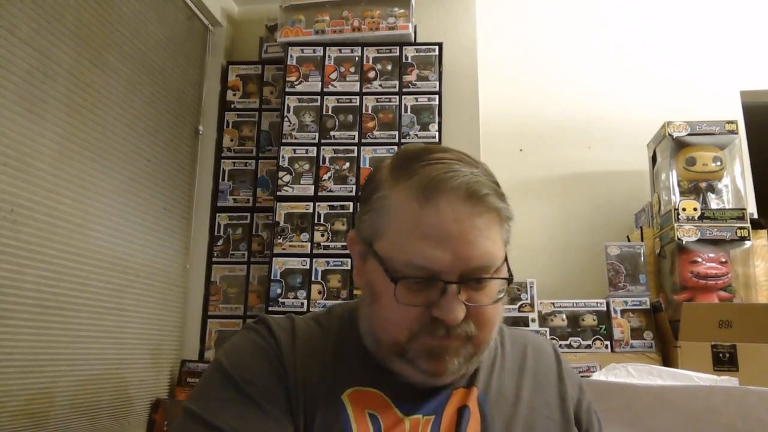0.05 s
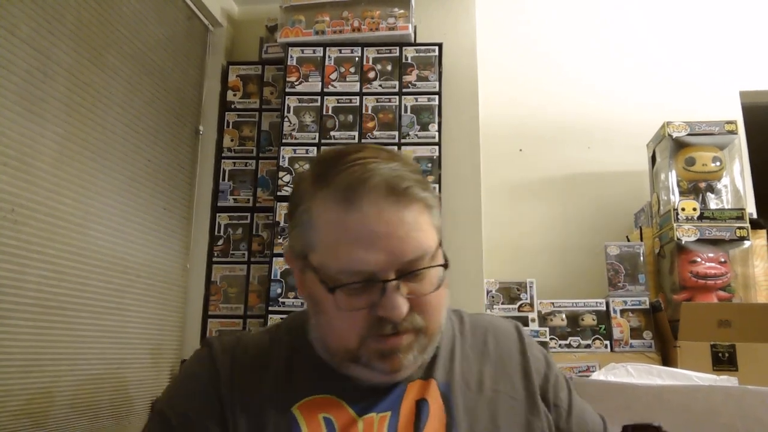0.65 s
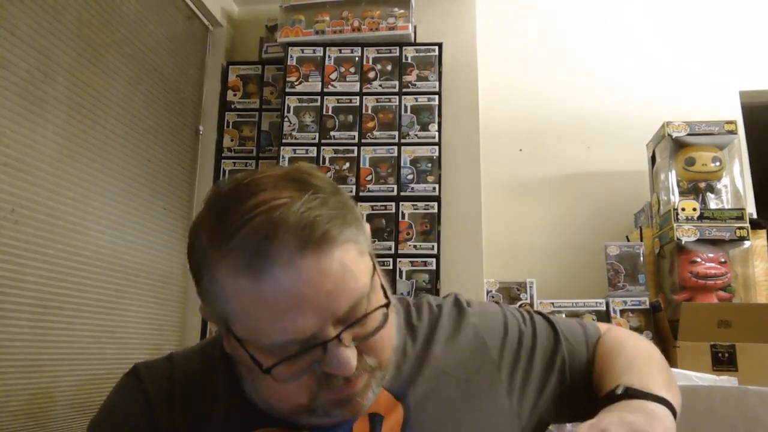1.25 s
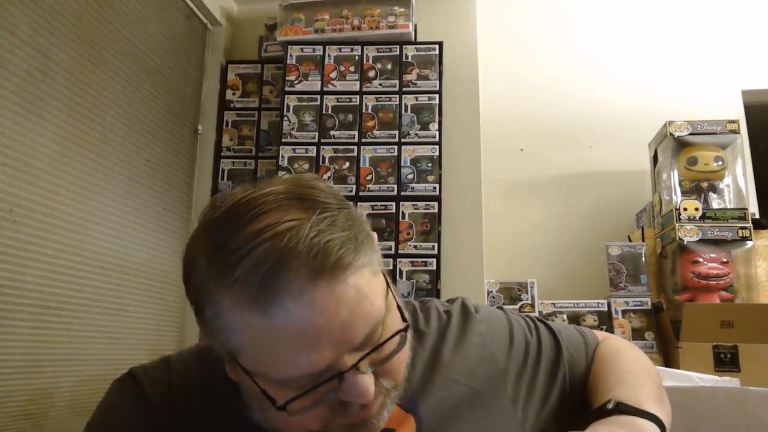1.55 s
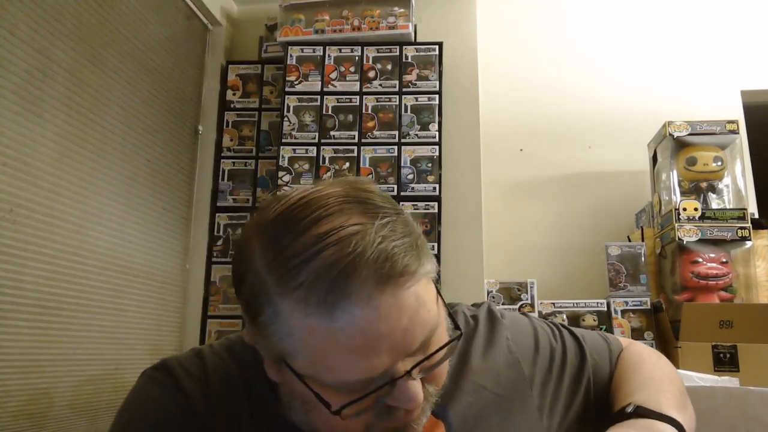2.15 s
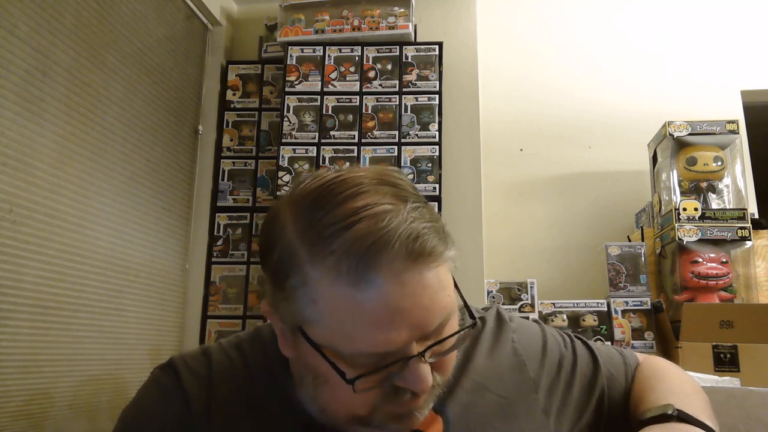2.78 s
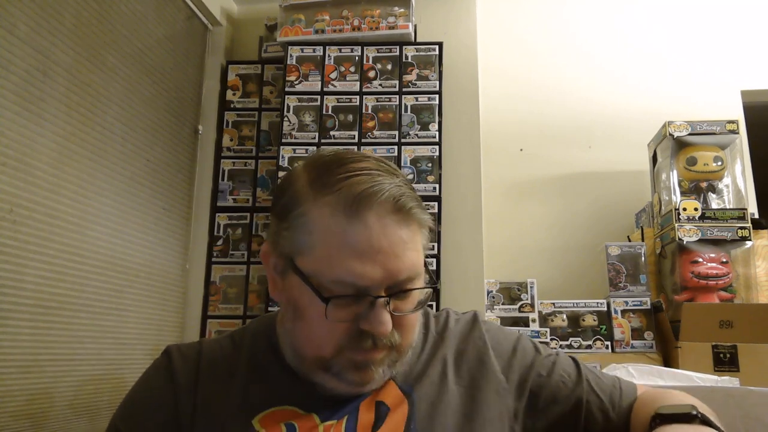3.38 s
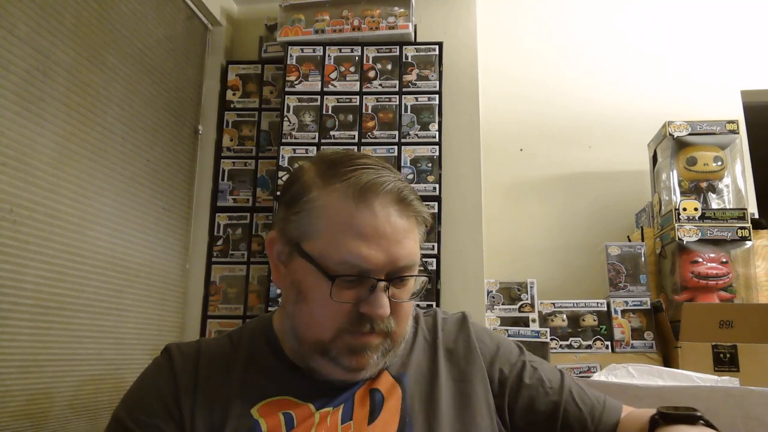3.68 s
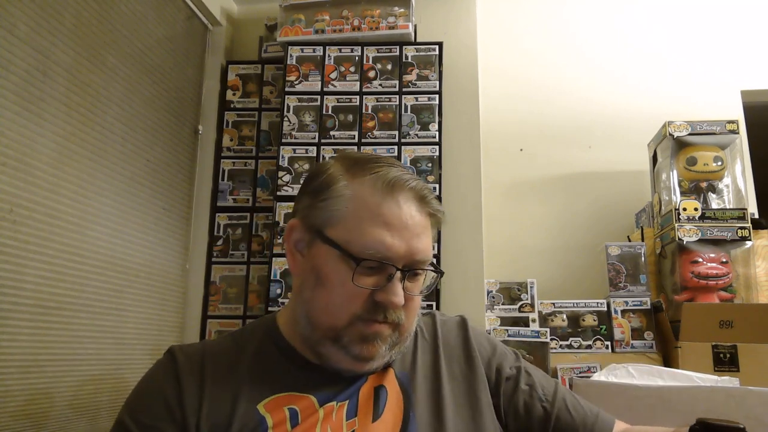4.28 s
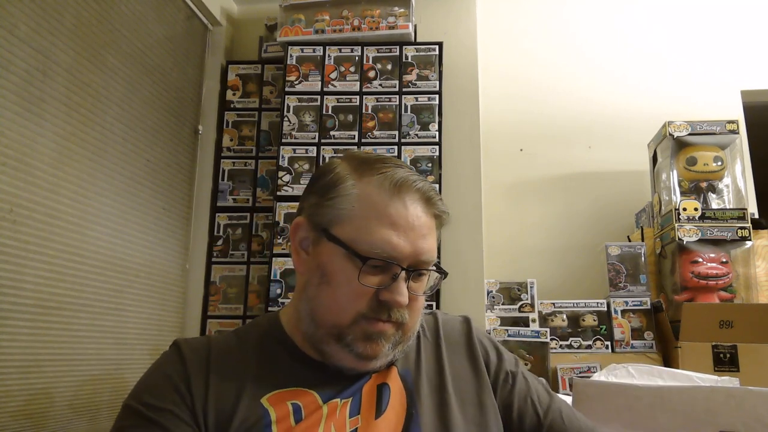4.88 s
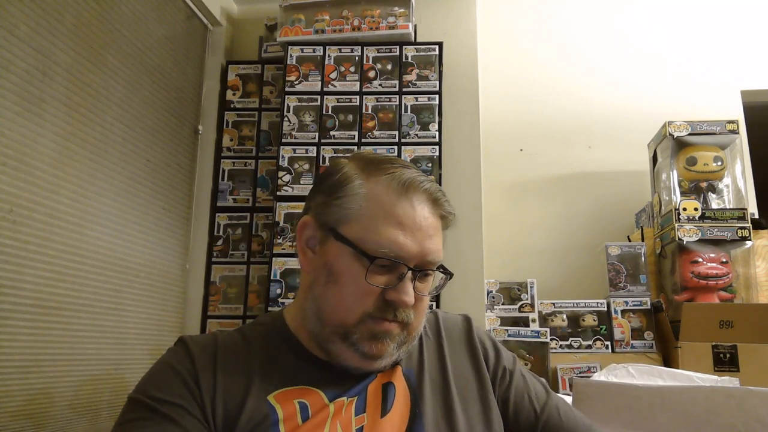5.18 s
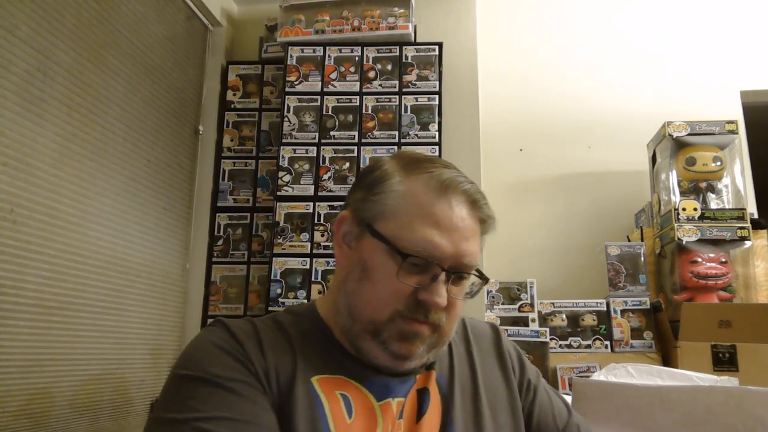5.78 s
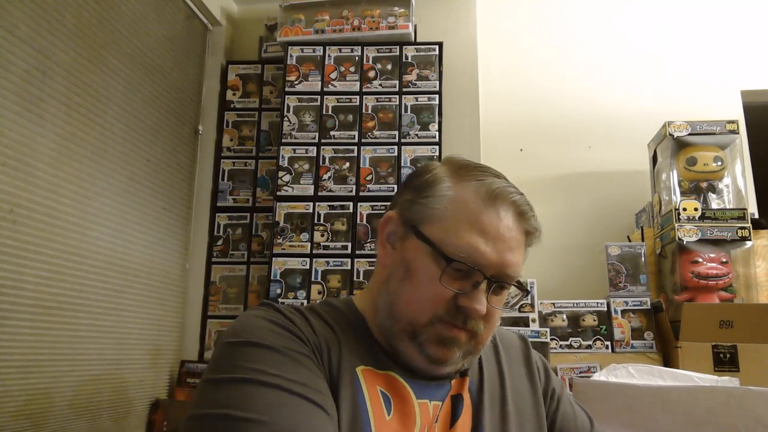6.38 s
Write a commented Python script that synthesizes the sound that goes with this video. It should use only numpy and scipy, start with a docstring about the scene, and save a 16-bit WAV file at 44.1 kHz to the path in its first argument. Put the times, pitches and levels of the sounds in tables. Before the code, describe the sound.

In a small room, close to the microphones, a box gives a dull knock on a desk and fingernails tick at the edge of its tape. The packing tape then peels off the cardboard in two loud, stuttering rips full of sharp snaps, with slack plastic crinkling in between. The freed flap shivers briefly, leaving a few light handling clicks over quiet room noise.

```python
"""Packing tape is picked loose and ripped off a cardboard box in two pulls, at a desk in a small room.
The glue lets go in tiny slips, fast runs and single snaps; each jerk rings the taut film, the carton's
flap and its hollow body. Slack film crinkles, fingers squeak faintly, and the freed flap shivers.
The box bumps the desk first, a faint hum dies away midway, and two closely spaced microphones listen."""
import sys
import numpy as np
from scipy import signal
from scipy.fft import rfft, irfft
from scipy.io import wavfile
from scipy.ndimage import uniform_filter1d

SR = 44100
rng = np.random.default_rng(int(sys.argv[2]) if len(sys.argv) > 2 else 0)


def log_audio(samples):
    """Write samples as a 16-bit WAV file to the path given in sys.argv[1]."""
    # one column per channel
    frames = np.atleast_2d(samples).T
    # limit to full scale, then quantise
    limited = np.clip(frames, -1, 1)
    pcm = np.round(limited * 32767).astype(np.int16)
    wavfile.write(sys.argv[1], SR, pcm)


N = 288414
TIME = np.arange(N) / SR
# Flap resonances in the first grip. Each row: frequency in Hz, width in Hz, gain in dB.
FLAP_FIRST_GRIP = [(1165, 470, -8.5), (1850, 324, -2.5), (2360, 290, 5), (2474, 520, 3.5)]


def from_db(db):
    """Decibels to gain."""
    return 10 ** (np.asarray(db) / 20)


def unit(x):
    """Scale to unit energy."""
    return x / np.sqrt(np.sum(x ** 2, axis=-1, keepdims=True) + 1e-20)


def on_bins(points, size):
    """Interpolate a table over log frequency at the FFT bins."""
    hz, value = np.transpose(points)
    return np.interp(np.log(np.fft.rfftfreq(size, 1 / SR) + 1), np.log(hz), value)


def drift(rate_hz):
    """Slow random wander between Gaussian points."""
    return np.interp(TIME * rate_hz, np.arange(4096), rng.standard_normal(4096))


def impulse(spectrum, size=2048):
    """Minimum-phase response with this spectrum; unit energy."""
    cepstrum = irfft(np.log(from_db(on_bins(spectrum, size))))
    cepstrum[1:size // 2] *= 2
    cepstrum[size // 2 + 1:] = 0
    return unit(irfft(np.exp(rfft(cepstrum))))


def resonate(x, hz, width_hz):
    """Two-pole resonance, unit peak gain."""
    r = np.exp(-np.pi * width_hz / SR)
    feedback = [1, -2 * r * np.cos(2 * np.pi * hz / SR), r * r]
    return signal.lfilter(np.array([1, 0, -1]) * (1 - r * r) / 2, feedback, x)


def through(x, response):
    """Convolve, cut to scene length."""
    return signal.oaconvolve(x, response)[:N]


def add(track, start_s, sound):
    """Mix a sound in at start_s."""
    i = max(int(start_s * SR), 0)
    track[..., i:i + sound.shape[-1]] += sound[..., :N - i]


def burst(x, start_s, length_s, rise_db=0):
    """A stretch of x with a level ramp; unit rms."""
    part = x[int(start_s * SR):][:int(length_s * SR) + 1]
    return unit(part * from_db(np.linspace(0, rise_db, len(part)))) * np.sqrt(len(part))


def diffuse(spectrum, size):
    """Stereo noise from all sides, alike in the bass, unrelated in the treble; unit energy."""
    # Each row: frequency in Hz, left-right correlation.
    coherence = [(50, 0.89), (300, 0.92), (1200, 0.87), (2500, 0.95), (4500, 0.075), (8000, 0), (15000, 0)]
    alike = on_bins(coherence, size)
    mid, side = rfft(rng.standard_normal((2, size)))
    pair = np.sqrt(1 + alike) * mid + np.sqrt(1 - alike) * side * [[1], [-1]]
    return unit(irfft(pair * from_db(on_bins(spectrum, size)), size))


def background(floor_db=-54.5, hum_hz=116, whine_hz=8000):
    """Room rumble and microphone hiss, a wavering hum and a very thin whine."""
    # Each row: frequency in Hz, relative density in dB.
    floor_spectrum = [(20, -3), (70, -7), (146, -13), (350, -23.5), (480, -22.5), (700, -26.5), (1400, -32),
                      (2400, -36.5), (3400, -48), (4700, -33), (6400, -49.5), (8500, -46), (11000, -55),
                      (16000, -56)]
    # Each row: time in seconds, level in dB.
    hum_levels = [(0, -68), (.15, -55.5), (.3, -57), (1.0, -60), (1.3, -51.5), (2.0, -56), (2.7, -54),
                  (3.0, -62.5), (3.2, -92.5), (6.54, -85.5)]
    floor = from_db(floor_db) * np.sqrt(N) * diffuse(floor_spectrum, size=N)
    phase = 2 * np.pi * np.cumsum(hum_hz + 0.34 * drift(rate_hz=6.4)) / SR
    hum_db = np.interp(TIME, *np.transpose(hum_levels)) + 1.3 * drift(rate_hz=3.3)
    hum = from_db(hum_db) * np.sin(phase)
    whine = from_db(-90.5) * np.sin(2 * np.pi * whine_hz * TIME)
    return floor + np.sqrt(2) * (hum + whine)


def handling_db(hold_db=-75.5, attack_s=0.012, sag_db_per_s=11, release_db_per_s=296):
    """Level of the hands' work: over the held box's rustle, each stroke sets in, slackens and lets go."""
    # Rubs, picks and tugs. Each row: start in seconds, length in seconds, level in dB.
    strokes = [(0.143, 0.26, -62), (0.546, 0.14, -50), (0.676, 0.041, -51.5), (0.769, 0.18, -52.5),
               (0.976, 0.34, -52), (1.33, 0.1, -60), (1.435, 0.099, -51), (1.56, 0.44, -63.5),
               (2.188, 0.25, -68.5), (2.373, 0.078, -55), (3.421, 0.038, -56), (3.525, 0.077, -47.5),
               (3.577, 0.19, -43), (3.799, 0.017, -44.5), (3.88, 0.17, -63), (4.039, 0.18, -56),
               (4.28, 0.066, -57), (4.415, 0.047, -48.5), (5.276, 0.39, -65), (5.881, 0.065, -68),
               (6.024, 0.03, -61)]
    power, t = np.full(N, from_db(hold_db) ** 2), TIME[:SR]
    for start_s, length_s, db in strokes:
        fall_db = sag_db_per_s * t + release_db_per_s * np.maximum(t - length_s, 0)
        stroke = np.minimum(t / attack_s, 1) * from_db(db - fall_db)
        add(power, start_s, stroke ** 2)
    return 10 * np.log10(power)


def body(modes):
    """Response of cardboard to one jerk; unit energy."""
    click = signal.unit_impulse(4096)
    return unit(sum((-1) ** k * from_db(db) * resonate(click, hz, width_hz)
                    for k, (hz, width_hz, db) in enumerate(modes)))


def snap(response, after_db, after_t60_s, after_per_s=2500):
    """One jerk and a brief, fading train of followers ring a response; unit energy."""
    t = TIME[:SR // 50]
    force = from_db(after_db - 60 * t / after_t60_s) * rng.standard_normal(len(t))
    force *= rng.random(len(t)) < after_per_s / SR
    force[0] = 1
    return unit(np.convolve(force, response))


def bumps(slap_db=8):
    """Soft knocks of the carton ring the low modes of box and desk and make the flap slap."""
    # Each row: time in seconds, level in dB.
    knocks = [(0.1615, -20.5), (.171, -51), (.404, -46), (2.37, -41)]
    # Each row: frequency in Hz, gain in dB, T60 in seconds.
    desk_modes = [(69, -22, 0.59), (151, -6, 0.063), (200, -23, 0.029), (299, -10, 0.088), (377, -1, 0.024),
                  (484, -13.5, 0.023)]
    t, thuds, slaps = TIME[:SR // 2], np.zeros(N), np.zeros(N)
    knock = sum(from_db(db - 60 * t / t60_s) * np.sin(2 * np.pi * hz * t) for hz, db, t60_s in desk_modes)
    for start_s, db in knocks:
        add(thuds, start_s, from_db(db) * knock)
        slap = snap(body(FLAP_FIRST_GRIP), after_db=2.0, after_t60_s=0.056)
        add(slaps, start_s, from_db(db + slap_db) * slap)
    cushion = signal.butter(6, 590, fs=SR, output="sos")  # cardboard gives way: a dull contact
    return signal.sosfilt(cushion, thuds + 1e-18) + slaps


def coupling(time_s, film_db, flap_shift_db, hollow_shift_db):
    """Gains from a jerk to film, flap and hollow; they vary as hands and peel line travel."""
    # Each row: time in seconds, flap and hollow drive in dB re film.
    box_drive = [(0.3, 0.5, 3), (0.55, -18, -31), (0.63, -7.5, -35), (0.72, -16.5, -11.5), (1.1, -7, -19),
                 (1.3, -9.5, -20), (1.48, -12.5, -13.5), (1.6, -14, -11.5), (2.0, -11, -4),
                 (2.33, -20, 3.5), (2.45, -18, -28), (2.65, -14, -26.5), (2.85, -15.5, -26.5),
                 (2.92, -7.5, -27), (3.04, -15.5, -19), (3.14, -14.5, -21.5), (3.3, -14.5, -12.5),
                 (3.68, -12.5, -12), (4.0, -14, -21), (4.52, -15.5, -14.5), (4.66, -6, -15),
                 (4.95, -4.5, -19.5), (5.14, -3.5, -27), (5.3, -9, -24), (5.6, -4, -31), (6.14, -9.5, -24)]
    at_s, flap_db, hollow_db = np.transpose(box_drive)
    return from_db([film_db,
                    film_db + np.interp(time_s, at_s, flap_db) + flap_shift_db,
                    film_db + np.interp(time_s, at_s, hollow_db) + hollow_shift_db])


def slips(per_s, spread_db, window_s):
    """Random jerks of uneven force, levelled to unit mean power over window_s."""
    force = (rng.random(N) < per_s / SR) * from_db(spread_db * rng.standard_normal(N))
    force *= rng.choice([-1, 1], N)
    power = uniform_filter1d(force ** 2, int(window_s * SR))
    return force / np.sqrt(np.abs(power) + 1e-9)


def pulling_db():
    """Level of the two long pulls, silent outside them."""
    # Each row: time in seconds, crackle level in dB.
    first_pull = [(2.49, -50.5), (2.56, -39.5), (2.63, -30.5), (2.81, -32.5), (2.9, -29), (2.99, -40),
                  (3.1, -45), (3.16, -44), (3.23, -44), (3.31, -33.5), (3.38, -58)]
    second_pull = [(4.5, -56.5), (4.55, -27), (4.71, -43), (4.8, -41), (4.93, -46), (5.02, -31),
                   (5.09, -38), (5.151, -24), (5.22, -57)]
    return np.max([np.interp(TIME, *np.transpose(pull), left=-np.inf, right=-np.inf)
                   for pull in (first_pull, second_pull)], axis=0)


def sticking(runs, dip_db=4, lead_s=0.025):
    """Crackle gain: it sinks while the glue holds and tension builds ahead of each run."""
    starts_s = np.append(np.sort([start_s for start_s, _, _ in runs]), np.inf)
    ahead_s = starts_s[np.searchsorted(starts_s, TIME)] - TIME
    return from_db(-dip_db * np.exp(-ahead_s / lead_s))


def peeling(hands_db, firm_db=-43.5):
    """Forces on film, flap and hollow: a loose crackle, and dense runs where the tape gives way."""
    # Each row: start in seconds, length in seconds, level in dB.
    runs = [(0.644, 0.02, -42.5), (2.645, 0.021, -33), (2.726, 0.028, -26.5), (2.829, 0.0064, -22),
            (2.839, 0.044, -27.5), (2.885, 0.049, -30), (2.938, 0.019, -34), (3.141, 0.006, -25),
            (3.154, 0.011, -18), (3.167, 0.038, -26), (3.276, 0.0034, -29), (3.302, 0.0044, -19),
            (3.339, 0.0051, -28), (3.589, 0.045, -36), (3.671, 0.013, -30), (3.92, 0.0049, -48),
            (4.509, 0.024, -33), (4.569, 0.032, -17.5), (4.627, 0.0065, -20.5), (4.807, 0.02, -37),
            (4.892, 0.025, -33.5), (4.958, 0.012, -29.5), (4.974, 0.0052, -23.5), (4.998, 0.0088, -26.5),
            (5.025, 0.03, -39), (5.094, 0.011, -27), (5.129, 0.012, -25), (5.159, 0.012, -19.5)]
    gains = coupling(TIME, np.maximum(hands_db, pulling_db()), flap_shift_db=-2, hollow_shift_db=1.5)
    firmness = np.clip(gains[0] / from_db(firm_db), 0, 1) ** 0.19  # light rubs, firm breaks glue threads
    breaking = slips(per_s=1000, spread_db=6.0, window_s=0.014)
    rubbing = slips(per_s=1800, spread_db=9.0, window_s=0.12)
    force = gains * sticking(runs) * (firmness * breaking + np.sqrt(1 - firmness ** 2) * rubbing)
    ripping = slips(per_s=1300, spread_db=5.5, window_s=0.013)
    for start_s, length_s, db in runs:
        run_gains = coupling(start_s, db, flap_shift_db=2.84, hollow_shift_db=1.7)
        add(force, start_s, run_gains[:, None] * burst(ripping, start_s, length_s, rise_db=0.5))
    return force


def film_ring(film, hz, width_hz, ring_db):
    """The free span of film rings at a pitch set by its length and tension."""
    return unit(film + from_db(ring_db) * resonate(film, hz, width_hz))


def ticks(hands_db, per_s=29, over_hands_db=27, pitch_hz=4700, ring_db=9.5):
    """Rows of tiny random snaps under the fingers, as strong as the hands are busy."""
    at = np.flatnonzero(rng.random(N) < per_s / SR)
    size, detune = rng.standard_normal((len(at), 2)).T
    levels_db = hands_db[at] + over_hands_db + 0.5 * size
    return list(zip(TIME[at], levels_db, pitch_hz * np.exp(0.1 * detune), np.full(len(at), ring_db)))


def cardboard(force, first_modes, second_modes, regrip_s=4.2):
    """A part of the box rings differently once it is gripped anew between the pulls."""
    first = TIME < regrip_s
    return through(force * first, body(first_modes)) + through(force * ~first, body(second_modes))


def tape(hands_db):
    """Slips and snaps of the glue sound through the film, the flap and the hollow of the box."""
    # Each row: frequency in Hz, relative density in dB.
    film_spectrum = [(1060, -30), (1800, -13), (2010, -15.5), (2180, -7), (2790, -6.5), (4530, 1),
                     (5150, -0.5), (5960, -7.5), (7030, -11.5), (10300, -20), (14500, -31.5), (16000, -44)]
    # Each row: time in seconds, level in dB, film pitch in Hz, ring of the free span in dB.
    snaps = [(0.1619, -19.5, 3700, 14), (0.1789, -25.5, 4330, 20), (0.5488, -6.5, 4700, 22),
             (0.562, -6.5, 4570, 24), (0.567, -7, 4540, 24), (0.6777, -6, 4530, -11),
             (0.6849, -12.5, 4860, 12), (0.7123, -15.5, 5300, 21), (0.7665, -14, 5300, 17),
             (0.902, -26, 4330, 19), (1.002, -19, 5140, 8), (1.0478, -29.5, 4600, 0),
             (1.1864, -16.5, 3530, -7), (1.1985, -18.5, 5430, 24), (1.2195, -23, 5200, 15),
             (1.2602, -19.5, 4480, -18), (1.3304, -21.5, 5070, 4), (1.3636, -22, 5050, 7),
             (1.498, -16.5, 4500, 19), (1.528, -15.5, 5500, 0), (1.5724, -15, 5170, -9),
             (1.7223, -23.5, 4660, -18), (2.3713, -23, 4750, -15), (2.4434, -18.5, 5360, 20),
             (2.5329, -13, 5250, 13), (2.599, -3.5, 4660, 29), (2.6421, 0, 4350, 31),
             (2.6529, 0.5, 3250, 2), (2.756, 1, 4270, 20), (2.846, -2.5, 3730, 3), (2.9192, 3, 3370, 14.5),
             (2.9936, 2.5, 4300, 4), (3.0498, 9, 4740, 13), (3.1064, -14, 4300, 3),
             (3.1188, 6.5, 4200, -12), (3.132, 8.5, 4530, -25), (3.183, 2.5, 4120, -7),
             (3.197, -3.5, 5500, -5), (3.2016, 4, 4900, 11), (3.2459, -12, 5070, 2), (3.279, 6.5, 4630, 10),
             (3.305, 1.5, 4150, 23), (3.522, -14, 4030, -12), (3.596, -2.5, 3900, 0), (3.7422, 5, 6800, 15),
             (3.9279, -8, 6000, 17), (4.1689, -19, 5300, 0), (4.3253, -21, 5800, 19),
             (4.461, -13.5, 4530, 22), (4.5134, 10.5, 4700, 16), (4.5442, 3, 5070, 22),
             (4.5742, 0, 4240, 5), (4.5847, 7, 4000, 22), (4.602, 1, 4270, 9), (4.664, 1, 3100, 3),
             (5.0685, 0.5, 3970, -2), (5.0972, 8.5, 4690, -13), (5.1293, -9.5, 4660, -8),
             (5.1639, 5, 3600, 2), (5.4382, -26.5, 4430, 0), (5.4786, -17, 5040, 0),
             (5.5361, -31, 3960, -16), (5.6324, -32, 4070, -5), (6.0437, -26.5, 4110, -4),
             (6.1417, -21.5, 6370, 21.5)]
    # Box resonances by grip. Each row: frequency in Hz, width in Hz, gain in dB.
    flap_second_grip = [(1050, 300, -6.5), (1276, 120, 3), (1745, 170, 3), (1863, 410, 0), (2336, 360, 3.5),
                        (2468, 160, 6.5), (3200, 800, -5.5)]
    hollow_first_grip = [(146, 44, 0), (235, 78, 2.5), (333.6, 73, 1), (460, 78, -1.5), (813, 2700, -13)]
    hollow_second_grip = [(75, 99, -7), (165, 56, 3.5), (262, 180, 1.5), (484, 90, 4.5), (605, 200, -1.5),
                          (800, 140, -1)]
    on_film, on_flap, on_hollow = peeling(hands_db)
    response = impulse(film_spectrum)
    pitches_hz = np.geomspace(2500, 7000, num=10)
    span = rng.integers(0, len(pitches_hz), N)  # each slip rings a random pitch
    film = sum(through(on_film * (span == k), film_ring(response, hz, width_hz=740, ring_db=5.5))
               for k, hz in enumerate(pitches_hz))
    for start_s, db, hz, ring_db in snaps + ticks(hands_db):
        spared_db = 0.15 * ring_db  # a ringing span drives the box less
        gains = coupling(start_s, db, flap_shift_db=-1.5 - spared_db, hollow_shift_db=-3.5 - spared_db)
        to_film, to_flap, to_hollow = gains[:, None]
        ring = film_ring(response, hz, width_hz=1100, ring_db=ring_db)
        add(film, start_s, to_film * snap(ring, after_db=-6.5, after_t60_s=0.014))
        add(on_flap, start_s, to_flap * snap([1], after_db=-7.0, after_t60_s=0.026))  # longer chatter
        add(on_hollow, start_s, to_hollow)
    flap = cardboard(on_flap, FLAP_FIRST_GRIP, flap_second_grip)
    hollow = cardboard(on_hollow, hollow_first_grip, hollow_second_grip)
    return film + flap + hollow


def crinkles(hands_db, re_hands_db=-12.5, re_pull_db=-14.5):
    """Slack film buckles in tiny creases, higher than the taut span and brighter when forced."""
    # Each row: start in seconds, length in seconds, level in dB, share of hard creases from 0 to 1.
    crumples = [(0.546, 0.016, -37, 0), (0.67, 0.063, -52, 0.6), (1.658, 0.0037, -60, 0.5),
                (1.772, 0.0076, -59, 0), (1.858, 0.003, -51, 0.1), (1.901, 0.0058, -51, 0),
                (2.188, 0.1, -62.5, 0.2), (2.382, 0.078, -50.5, 0.5), (3.157, 0.05, -37.5, 0.9),
                (3.589, 0.11, -39, 0.3), (3.741, 0.0041, -28, 0.6), (4.14, 0.031, -56, 0.6),
                (4.409, 0.091, -55, 0.3), (4.511, 0.0043, -21, 0.75), (6.138, 0.016, -52, 0.57)]
    # Each row: frequency in Hz, relative density in dB.
    soft_spectrum = [(2000, -40), (4300, 8), (6000, 2), (8400, 1), (10000, -16), (16000, -22.5)]
    hard_spectrum = [(2000, -42.5), (5000, 4.5), (7500, 2.5), (11000, -6.5), (16000, -9.5)]
    loose = slips(per_s=290, spread_db=10.0, window_s=0.08)
    soft = from_db(hands_db + re_hands_db) * loose
    hard = from_db(pulling_db() + re_pull_db) * loose
    gentle, forced = (slips(per_s=2800, spread_db=11.5, window_s=0.0068) for _ in range(2))
    for start_s, length_s, db, hard_share in crumples:
        add(soft, start_s, from_db(db) * np.sqrt(1 - hard_share) * burst(gentle, start_s, length_s))
        add(hard, start_s, from_db(db) * np.sqrt(hard_share) * burst(forced, start_s, length_s))
    return through(soft, impulse(soft_spectrum)) + through(hard, impulse(hard_spectrum))


def squeaks():
    """A finger sliding on the film drives one narrow resonance; it swells and fades."""
    # Each row: start in seconds, length in seconds, pitch in Hz, level in dB.
    slides = [(1.592, 0.39, 2540, -70.5), (1.868, 0.2, 1470, -76)]
    out, friction = np.zeros(N), rng.standard_normal(N)
    for start_s, length_s, hz, db in slides:
        tone = burst(resonate(friction, hz, width_hz=130), start_s, length_s)
        add(out, start_s, from_db(db) * tone * np.sqrt(2 * np.hanning(len(tone))))
    return out


def freed_flap():
    """No longer damped by the tape, the flap shivers and dies away."""
    # In order: start in seconds, level in dB, pitch in Hz, width in Hz, T60 in seconds.
    flap_ring = (5.175, -42, 2150.5, 950, 0.38)
    start_s, db, hz, width_hz, t60_s = flap_ring
    t, out = TIME[:SR // 2], np.zeros(N)
    shiver = resonate(resonate(rng.standard_normal(len(t)), hz, width_hz), hz, width_hz)
    add(out, start_s, from_db(db - 60 * t / t60_s) * shiver / shiver.std())
    return out


def reflections(spectrum, start_s, t60_s):
    """A decaying stereo cloud of echoes; unit energy."""
    t = TIME[:SR // 2]
    return unit(diffuse(spectrum, size=len(t)) * from_db(-60 * t / t60_s) * (t > start_s))


def room(x, lag_s, near_db, far_db, moves_per_s, places=6):
    """Direct sound reaches the left microphone first; desk and wall echoes vary as the peel line moves."""
    # Each row: frequency in Hz, relative density in dB.
    near_spectrum = [(100, -10.0), (700, 4.0), (1500, -6.5), (6000, -3.5), (16000, 0.0)]
    far_spectrum = [(100, 0.5), (1400, -4.5), (2100, -1.5), (3000, -3.0), (5000, 0.5), (9000, -8.5),
                    (16000, -5.5)]
    delay = np.exp(-2j * np.pi * np.fft.rfftfreq(N, 1 / SR) * lag_s)
    out = np.array([x, irfft(rfft(x) * delay, N)])
    crossfades = unit(np.transpose([drift(moves_per_s) ** 3 for _ in range(places)])).T
    for weight in crossfades:
        near = from_db(near_db) * reflections(near_spectrum, start_s=0.00032, t60_s=0.045)
        far = from_db(far_db) * reflections(far_spectrum, start_s=0.0087, t60_s=0.17)
        out += [through(weight * x, echoes) for echoes in near + far]
    return out * from_db(-1.5)


def scene():
    """Tape and box in the room, over its background."""
    hands_db = handling_db()
    sources = tape(hands_db) + crinkles(hands_db) + squeaks() + freed_flap() + bumps()
    return room(sources, lag_s=33e-6, near_db=-4.0, far_db=-13.5, moves_per_s=18) + background()


def record(dry):
    """The microphones differ in the treble; peaks clip at full scale and the highest treble is cut."""
    # Each row: frequency in Hz, left over right in dB.
    left_lift = [(100, -0.2), (2500, -0.3), (5000, 0.1), (9000, 1), (14000, 4)]
    coloured = irfft(rfft(dry) * from_db(on_bins(left_lift, N) / 2 * [[1], [-1]]), N)
    lowpass = signal.ellip(10, 0.1, 70, 16200, fs=SR, output="sos")
    return signal.sosfilt(lowpass, np.clip(coloured, -1, 1))


dry = scene()
out = record(dry)
log_audio(out)
```